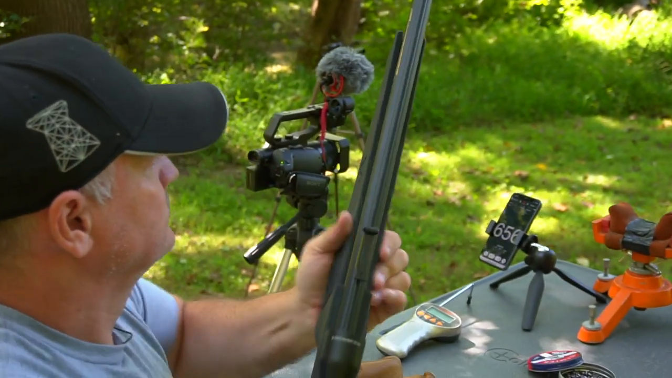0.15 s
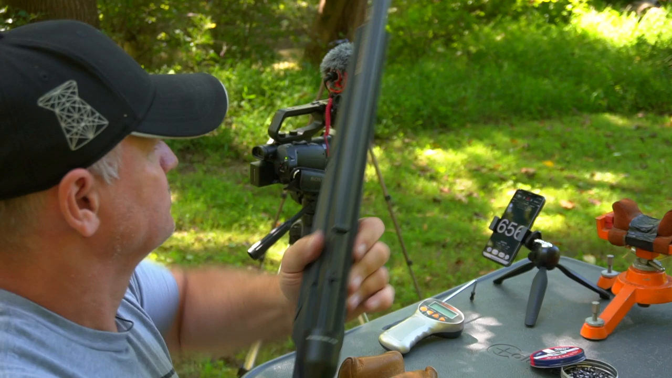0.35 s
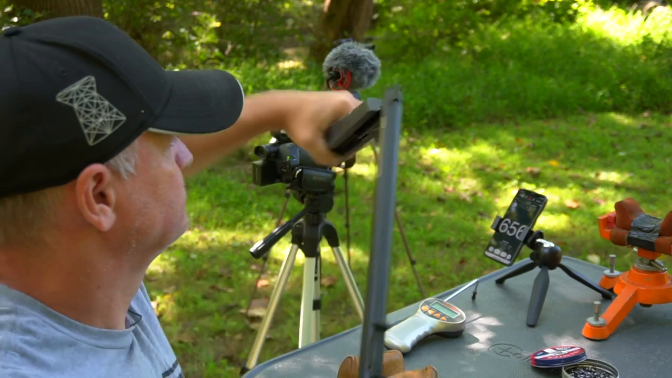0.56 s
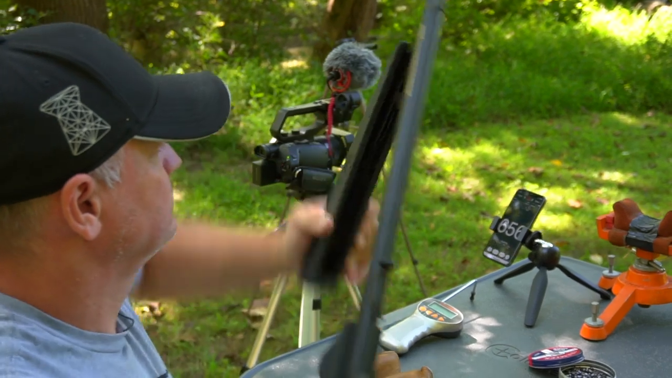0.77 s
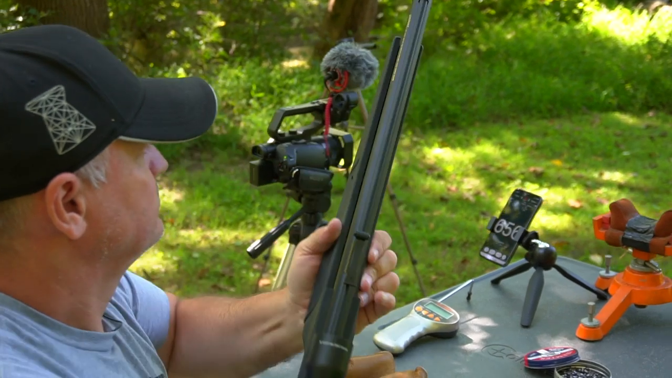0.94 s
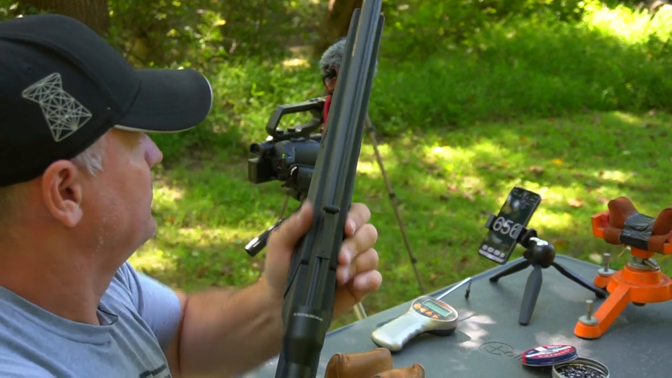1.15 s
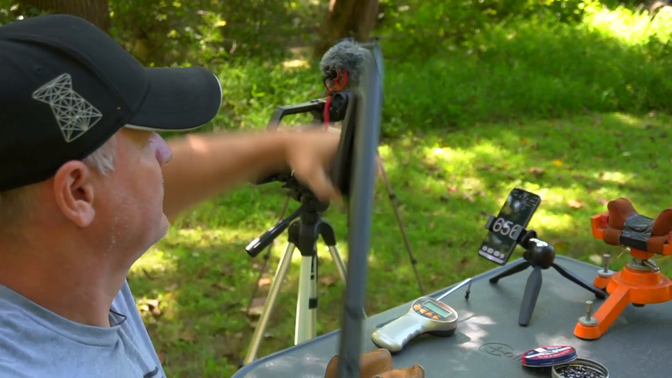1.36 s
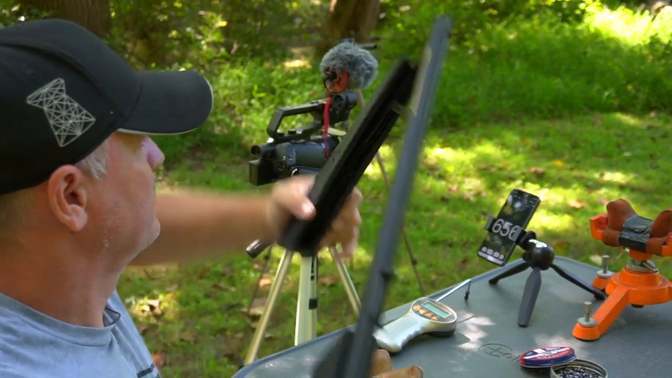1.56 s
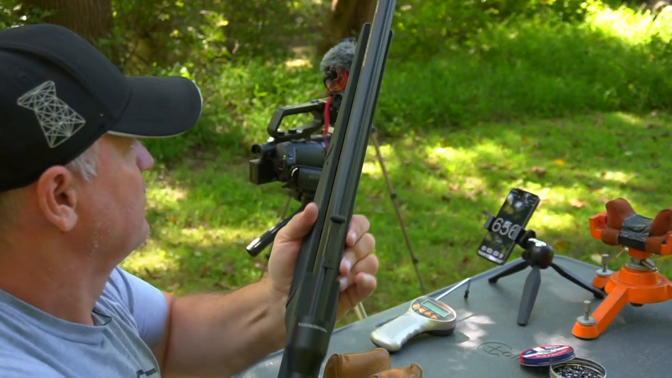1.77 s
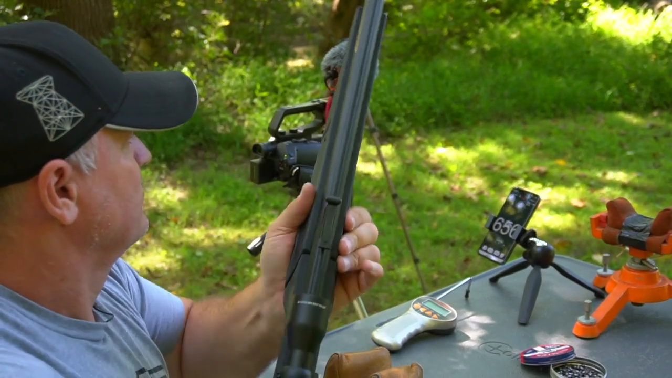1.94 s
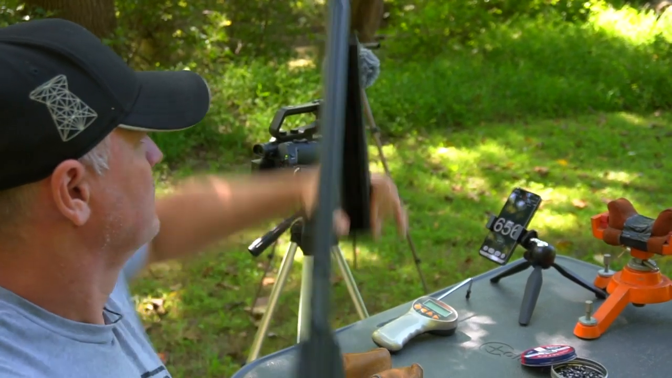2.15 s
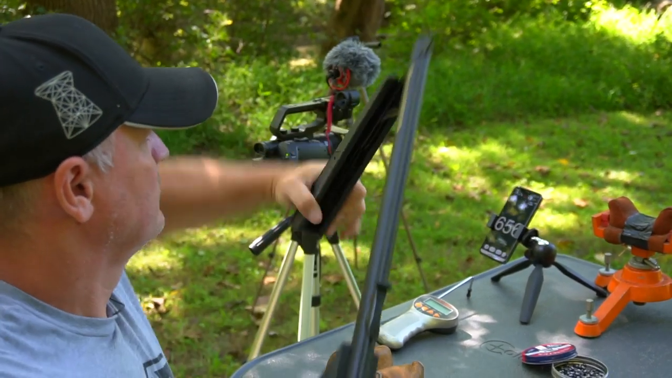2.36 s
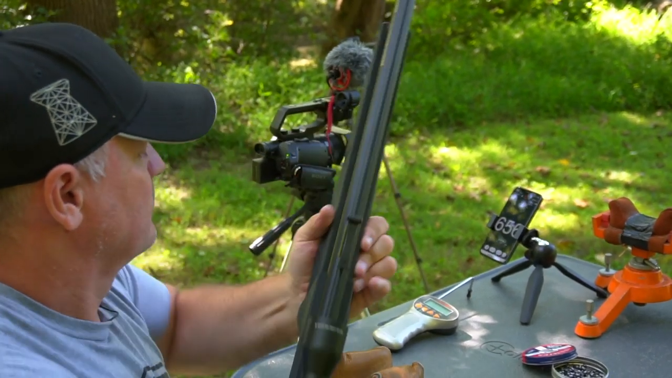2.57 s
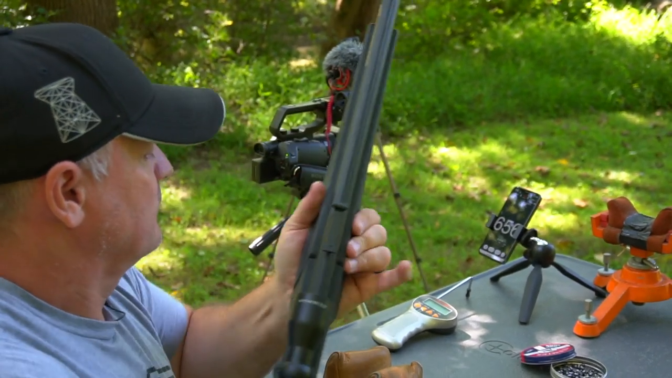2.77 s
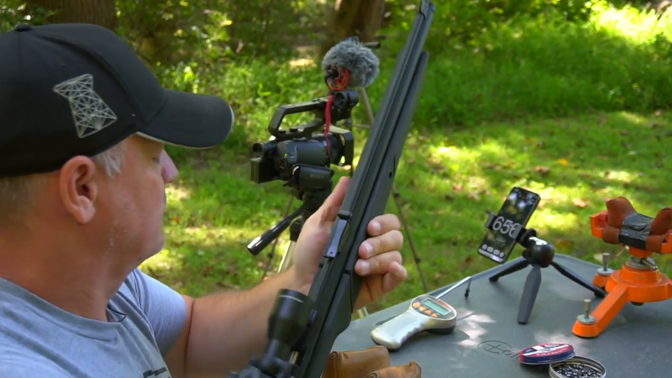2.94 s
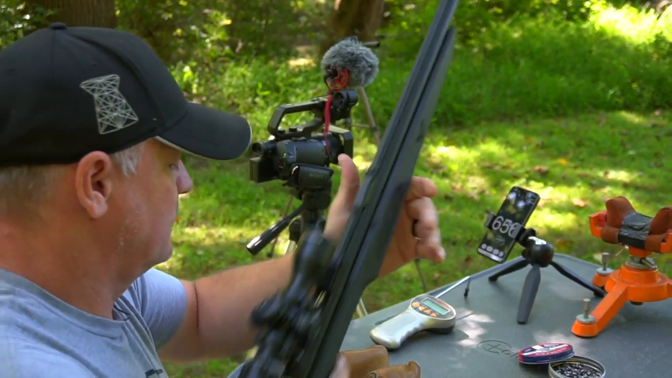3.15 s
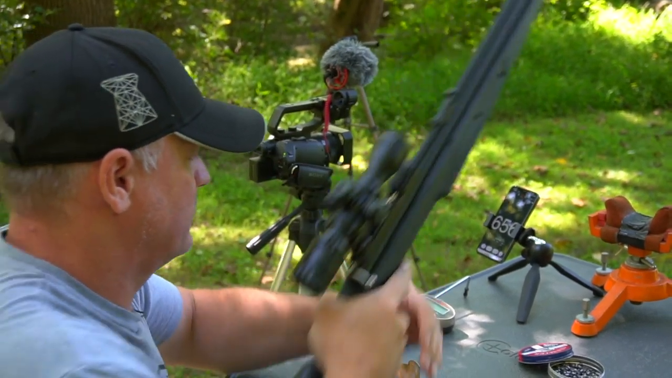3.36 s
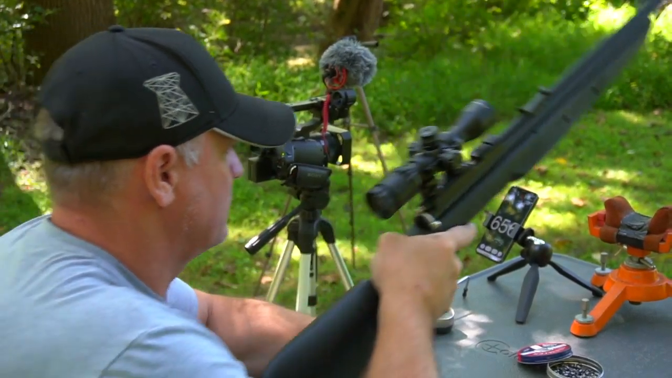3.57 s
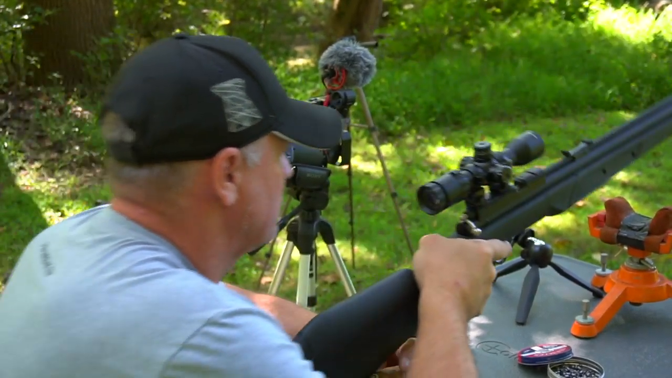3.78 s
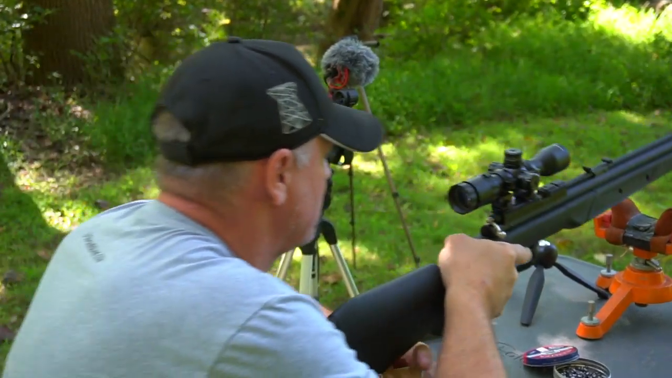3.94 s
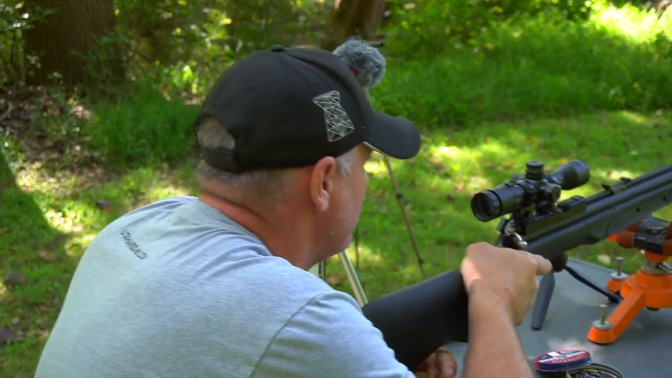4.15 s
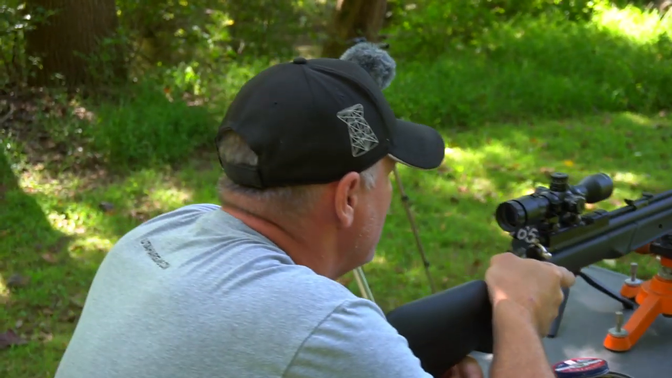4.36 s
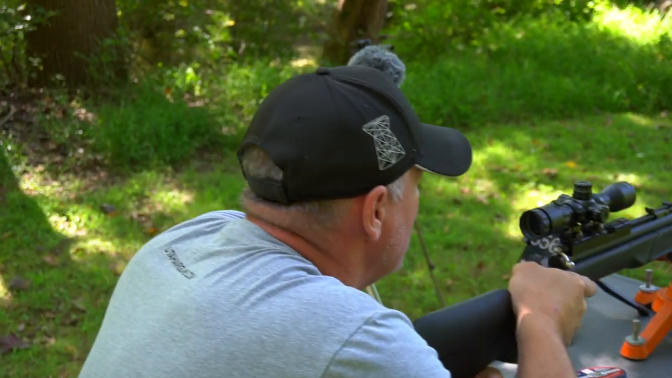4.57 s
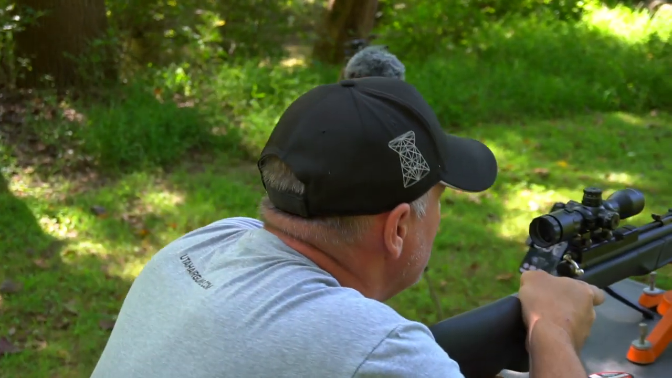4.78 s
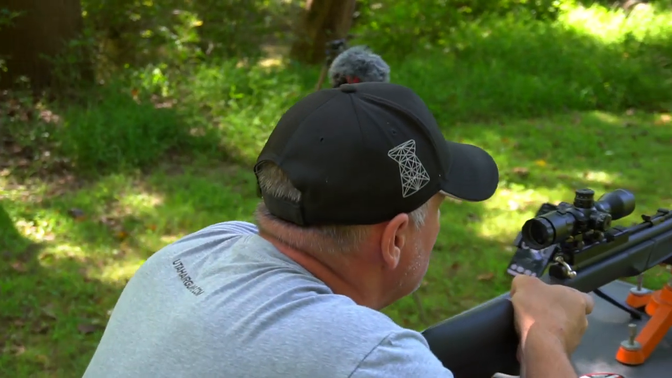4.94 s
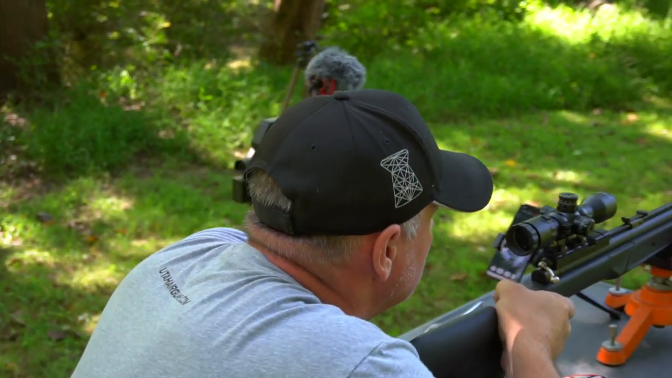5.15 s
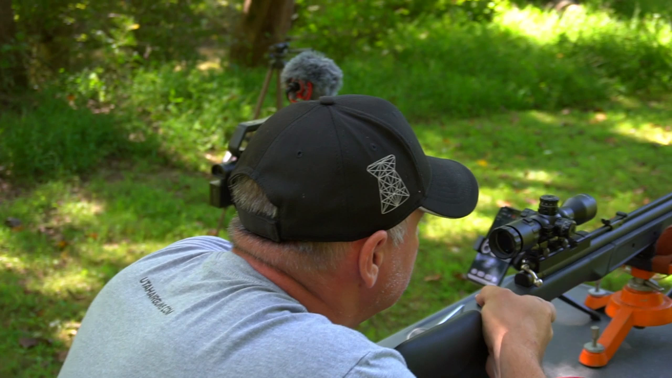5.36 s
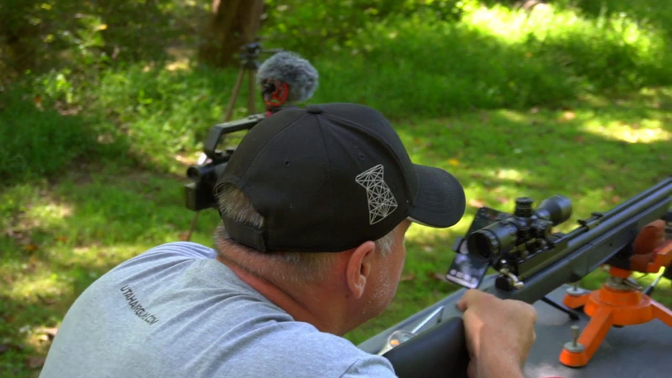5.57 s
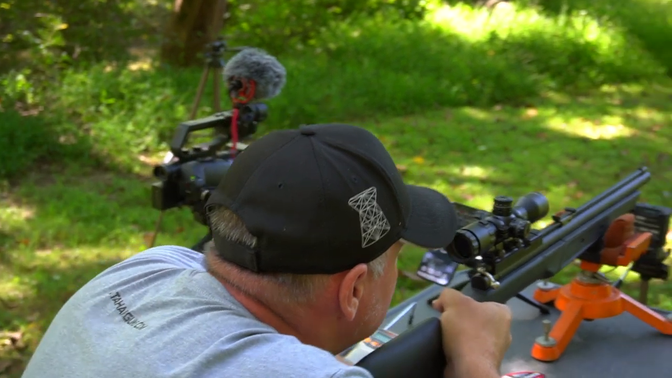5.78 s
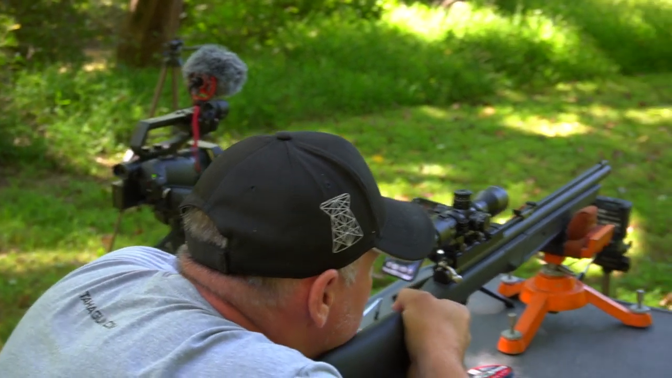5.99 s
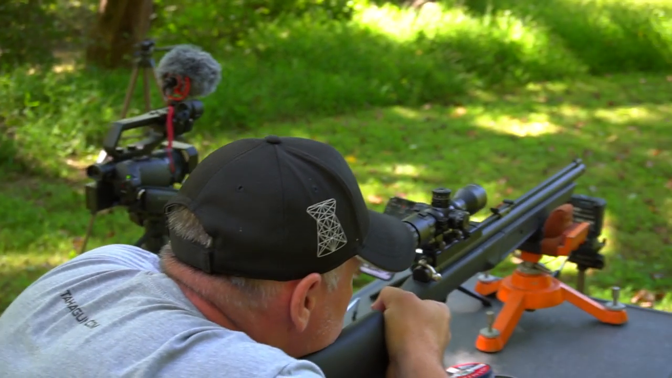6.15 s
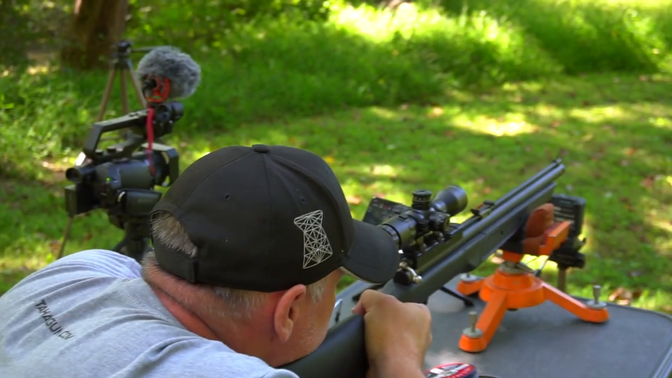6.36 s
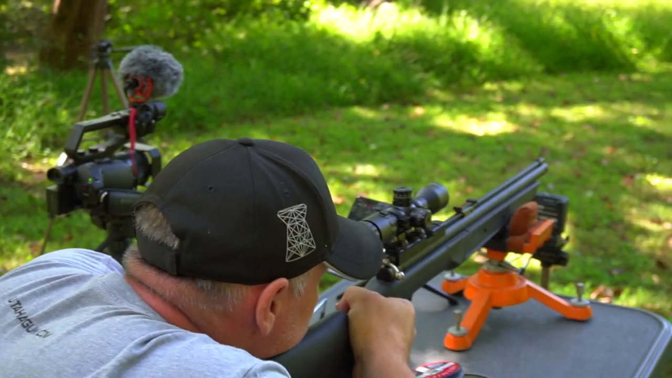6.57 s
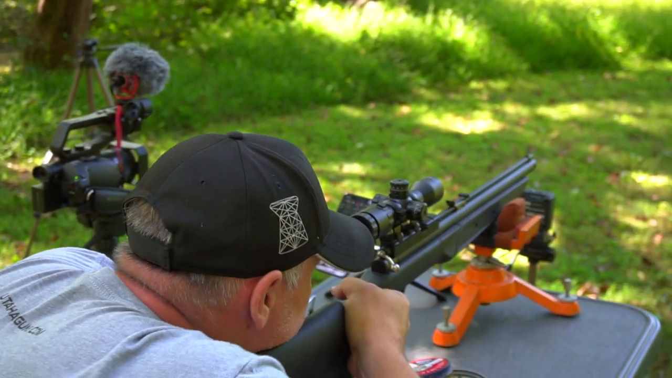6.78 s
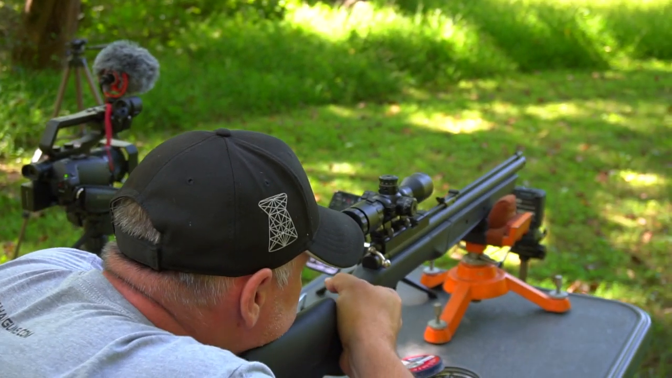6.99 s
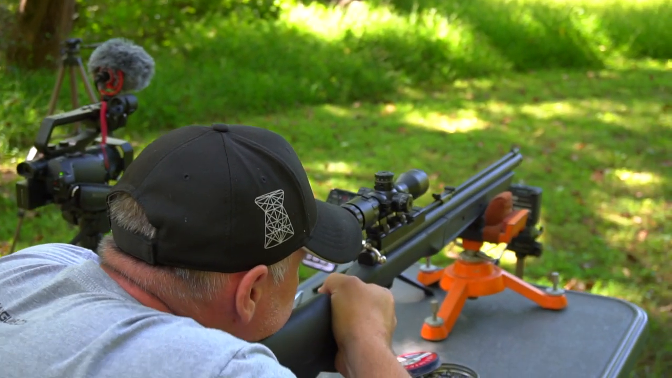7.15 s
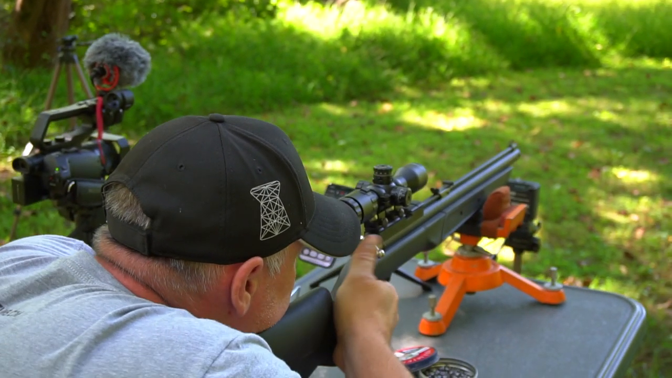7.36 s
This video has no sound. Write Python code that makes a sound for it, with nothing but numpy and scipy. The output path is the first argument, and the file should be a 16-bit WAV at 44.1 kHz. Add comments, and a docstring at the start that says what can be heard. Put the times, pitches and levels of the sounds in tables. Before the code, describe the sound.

In a leafy yard with steady cicadas, a nearby rifle lever squeaks and cracks shut four times, the first three followed by clattering linkage and scraping piston. Each blow leaves a thin echo in the trees. Then it is quieter: insect buzz, distant engine hum rising, wind gust, clicks and thuds of settling on a rest, sleeve rustle, and late katydid ticks.

```python
"""Cicadas drone over leafy air, light wind rumble on the microphone and a far engine's hum in a yard ringed by trees.
An air rifle is pumped four times: stick-slip squeaks under rising pressure, then a modal slam as the lever shuts.
After the first three slams the linkage rattles open and the piston scrapes; a katydid buzzes after the fourth.
Then the rifle is readied with bumps and clicks and laid on a rest, while the engine revs up and slowly fades.
Wind gusts and freshens, a sleeve brushes the table, and the katydid ticks and buzzes again near the end."""
import sys
import numpy as np
from scipy import signal
from scipy.fft import rfft, irfft, next_fast_len
from scipy.io import wavfile
from scipy.ndimage import uniform_filter1d, map_coordinates

SR = 44100
rng = np.random.default_rng(int(sys.argv[2]) if len(sys.argv) > 2 else 0)


def to_wav(sig):
    """Store sig (one row per channel, or 1-D mono) as 16-bit WAV at the path in sys.argv[1].

    Samples outside -1..1 are clipped; the rate is SR.
    """
    pcm = np.clip(np.atleast_2d(sig), -1, 1) * 32767
    pcm = np.round(pcm).astype(np.int16)
    wavfile.write(sys.argv[1], SR, pcm.T)  # frames by channels


N = 327222


def amp(db):
    """Decibels to gain."""
    return 10 ** (np.asarray(db) / 20)


def unit(x):
    """Scaled to rms 1."""
    return x / np.sqrt(np.mean(x ** 2) + 1e-20)


def along(points, hz):
    """(Hz, value) points read on a log frequency axis."""
    f, v = np.transpose(points)
    return np.interp(np.log(hz + 1), np.log(f), v)


def wobble(rate):
    """A smooth random curve with rate knots a second."""
    knots = rng.standard_normal(int(N * rate / SR) + 4)
    return map_coordinates(knots, [np.arange(N) * rate / SR])


def filtered(x, response):
    """x times a response of frequency."""
    m = next_fast_len(len(x) + 4096)
    return irfft(rfft(x, m) * response(np.fft.rfftfreq(m, 1 / SR)), m)[:len(x)]


def noise(spectrum, size=N):
    """Coloured noise of rms 1."""
    return unit(filtered(rng.standard_normal(size), lambda hz: amp(along(spectrum, hz))))


def resonate(x, peaks):
    """x through parallel resonances of alternating sign, at rms 1."""
    def response(f):
        """Sum of band-pass resonances."""
        total = 0
        for k, (centre, width, db) in enumerate(peaks):
            band = 1j * f * width / (centre * centre - f * f + 1j * f * width)
            total = total + (-1) ** k * amp(db) * band
        return total

    return unit(filtered(x, response))


def even(x, size=SR // 50):
    """Held at rms 1 from moment to moment."""
    return x / np.sqrt(np.abs(uniform_filter1d(x ** 2, size)) + 1e-9)


def fade(t, t60):
    """Exponential decay by 60 dB in t60 seconds."""
    return np.exp(-np.log(1000) * t / t60)


def ramp(u):
    """A smooth step from 0 to 1 as u goes from 0 to 1."""
    return np.sin(np.pi / 2 * np.clip(u, 0, 1)) ** 2


def swell(from_s, db_per_s):
    """A level in dB that holds at 0, then climbs steadily."""
    return db_per_s * np.maximum(np.arange(N) / SR - from_s, 0)


def add(track, s, sound):
    """Mix a sound in at s seconds."""
    part = track[max(round(s * SR), 0):][:len(sound)]
    part += sound[:len(part)]


CICADA_DB, CICADA_SWELL_FROM_S, CICADA_SWELL_DB_PER_S = -49, 4.27, 3
# colour of the massed cicadas: [f/Hz, relative level/dB per Hz]
CHORUS_SPECTRUM = [(2800, -39.5), (3850, -26), (4320, -15), (4700, -18), (5400, -4), (5950, 2), (6620, -5),
                   (7000, -10.5), (8060, -17.5), (10000, -35), (14000, -59.5)]


def cicadas():
    """Many cicadas blur into one band of noise that flickers slightly and later swells."""
    flicker_db = .4 * wobble(5.7) + .8 * wobble(90)
    level_db = CICADA_DB + swell(CICADA_SWELL_FROM_S, CICADA_SWELL_DB_PER_S) + flicker_db
    return amp(level_db) * noise(CHORUS_SPECTRUM)


AIR_DB, AIR_SWELL_FROM_S, AIR_SWELL_DB_PER_S = -54.5, 5.18, 2
# colour of leaves and distance: [f/Hz, relative level/dB per Hz]
BREEZE_SPECTRUM = [(50, 6.5), (100, 3.5), (300, 2), (700, -1), (1500, -5.5), (3200, -10.5), (10000, -20),
                   (16000, -18.5)]


def leafy_air():
    """Air in the leaves is broad, slowly wavering noise that swells late."""
    level_db = AIR_DB + swell(AIR_SWELL_FROM_S, AIR_SWELL_DB_PER_S) + 0.65 * wobble(5.8)
    return amp(level_db) * noise(BREEZE_SPECTRUM)


WIND_DB, WIND_RISE_FROM_S, WIND_RISE_DB_PER_S = -41, 4.41, 4  # the breeze freshens
GUST_S, GUST_WIDTH_S, GUST_DB = 4.45, .2, 9
# colour of wind on the microphone: [f/Hz, relative level/dB per Hz]
RUMBLE_SPECTRUM = [(6, -16.5), (12, -1), (24, 4), (34, -7), (50, -25), (100, -36), (300, -65.5)]


def wind():
    """Wind pushes on the microphone as deep noise, with one gust as the breeze begins to freshen."""
    t = np.arange(N) / SR
    gust_db = GUST_DB * np.exp(-((t - GUST_S) / GUST_WIDTH_S) ** 2)
    return amp(WIND_DB + swell(WIND_RISE_FROM_S, WIND_RISE_DB_PER_S) + gust_db) * noise(RUMBLE_SPECTRUM)


ENGINE_IDLE_DB, ENGINE_FULL_DB = -64, -49
ENGINE_REV_S, ENGINE_RISE_S, ENGINE_FADE_DB_PER_S = 4.1, 0.46, 4.5


def engine(engine_hz=130):
    """A far engine is one wavering sine that grows louder once, then slowly dies away."""
    t = np.arange(N) / SR
    revved_db = ENGINE_FULL_DB - swell(ENGINE_REV_S + ENGINE_RISE_S, ENGINE_FADE_DB_PER_S)
    rise = ramp((t - ENGINE_REV_S) / ENGINE_RISE_S)
    level_db = ENGINE_IDLE_DB + (revved_db - ENGINE_IDLE_DB) * rise + 1.1 * wobble(10)
    turn = 2 * np.pi * np.cumsum(engine_hz + 2.4 * wobble(7.7)) / SR
    return np.sqrt(2) * np.sin(turn) * amp(level_db)


# the lever is swung open: [t/s, rattle strength/dB, piston slide length/s, intake whistle level/dB]
LEVER_OPENINGS = [(.474, -1, 0.54, -49), (1.314, 0.5, .26, -46.5), (2.155, 1, .15, -45)]
# every opening's run of two double clacks as the linkage unfolds, then three at the end stop:
# [delay/s, level/dB before strength, mean ring f/Hz, tick level/dB relative to the clack]
LINKAGE_RATTLE = [(0, -14, 1920, -12.5), (.007, -11, 1832, -17), (0.033, -18.5, 3110, -14),
                  (.042, -9, 1443, -11), (.169, -13, 2792, -11), (.184, -11.5, 1110, -15),
                  (.212, -20.5, 2713, -18.5)]
# single light touches of lever, bolt and stock:
# [t/s, level/dB, mean ring f/Hz, tick level/dB relative to the touch]
LIGHT_CONTACTS = [(0.048, -17, 1610, -20.5), (0.443, -20.5, 2030, -7.5), (0.808, -31, 2980, -19),
                  (1.642, -17, 1755, -19.5), (2.431, -32, 1910, -6), (2.477, -21, 1740, -19.5),
                  (4.114, -40.5, 704, -20.5), (4.728, -18.5, 2293, -4.5), (4.731, -23.5, 1660, -12),
                  (4.771, -34.5, 1550, -22), (5.209, -39.5, 933, -10)]


def clacks():
    """The single contacts and every opening's rattle: (s, dB, ring Hz, tick dB)."""
    for opening_s, strength_db, _, _ in LEVER_OPENINGS:
        for delay, db, hz, tick_db in LINKAGE_RATTLE:
            yield opening_s + delay, strength_db + db, hz, tick_db
    yield from LIGHT_CONTACTS


# colour of a click, also of the piston's scrape: [f/Hz, relative level/dB per Hz]
CLICK_SPECTRUM = [(300, -26.5), (800, -5), (1600, 0.5), (3000, 0), (4500, -7), (9000, -37.5)]
# colour of the bright tick: [f/Hz, relative level/dB per Hz]
TICK_SPECTRUM = [(2500, -29), (5000, 3), (8500, -2), (10500, -13), (14000, -9.5), (16000, -15.5)]
# colour of the low knock: [f/Hz, relative level/dB per Hz]
KNOCK_SPECTRUM = [(60, -26), (150, -3.5), (550, 0.5), (1200, -14), (4000, -61)]


def contacts(click_db=-5, click_t60=0.026, ring_db=-6, ring_t60=.035, knock_db=-25, knock_t60=0.048,
             tick_trim_db=4, tick_t60=0.025, chatter_s=0.0046, chatter_db=-7):
    """Each light contact is a click, a ringing part, a low knock and a tick; the loose joint chatters once after."""
    out, t = np.zeros(N), np.arange(SR // 8) / SR
    attack = 1 - np.exp(-t / .002)
    for s, db, hz, tick_db in clacks():
        for late, drop_db in [(0, 0), (chatter_s * rng.uniform(0.27, 1), chatter_db)]:
            click = amp(click_db) * noise(CLICK_SPECTRUM, size=len(t)) * fade(t, click_t60)
            turn = 2 * np.pi * hz * rng.normal(1, .02) * t
            partials = np.sin(turn) + .5 * np.sin(1.7 * turn) + 0.44 * np.sin(2.2 * turn)
            ring = amp(ring_db) * partials * fade(t, ring_t60)
            knock = amp(knock_db) * noise(KNOCK_SPECTRUM, size=len(t)) * fade(t, knock_t60)
            tick = amp(tick_db + tick_trim_db) * noise(TICK_SPECTRUM, size=len(t)) * fade(t, tick_t60)
            add(out, s + late, amp(db + drop_db) * (click + ring + knock + tick) * attack)
    return out


SQUEAL_ATTACK_S, SQUEAL_LOAD, SQUEAL_LEAK_DB = .005, .15, -10  # load runs 0-1, leak is relative
PUSH_ATTACK_S, PUSH_RELEASE_S, PUSH_EASE_DB = .008, .03, 5.5  # the arm eases off as the lever goes over centre
LOAD_RISE_S, LOADED_SLIPS_PER_S = .04, 300
SAG_LEAD_S, SAG_S = .02, 0.046  # the slips begin to slow before the pressure bites
SPIN_UP, SPIN_UP_S = .14, .022  # share by which the slips start slow, time to reach full speed
WAVER, WAVER_PER_S = .045, 55  # the arm pushes unevenly: share of the slip rate, knots per second
JUDDER_DB, JUDDER_PER_S = 1.3, 120
# the unloaded pivot squeals and slows as the lever starts to close:
# [t/s, length/s, first slip f/Hz, last slip f/Hz, level/dB before trim]
PIVOT_SQUEALS = [(0.158, 0.053, 1830, 135, -26.5), (.961, .028, 1050, 410, -26.5),
                 (1.771, .038, 2150, 580, -31)]
# the push that compresses the air: [t/s, length/s, free slip f/Hz, pressure bite after/s,
# full air load/0-1, free level/dB before trim, loaded level/dB before trim]
PUMP_PUSHES = [(0.206, .067, 320, .027, 0.7, -21, -12.5), (.981, .122, 560, .07, 0.7, -20.5, -17),
               (1.818, 0.12, 610, .062, 0.2, -23.5, -22.5), (2.701, 0.086, 440, 0.042, 0.98, -22, -18.5)]


def strokes():
    """Each squeal and push as (start s, slips per second, level dB, air load, leak dB)."""
    for s, length, first, last, db in PIVOT_SQUEALS:
        t = np.arange(1, length * SR) / SR
        rate = first * (last / first) ** ramp(t / length)
        attack_db = 20 * np.log10(ramp(t / SQUEAL_ATTACK_S))
        yield s, rate, db + attack_db, SQUEAL_LOAD, SQUEAL_LEAK_DB
    for s, length, free, bite, full, free_db, loaded_db in PUMP_PUSHES:
        t = np.arange(1, length * SR) / SR
        pressure = ramp((t - bite) / LOAD_RISE_S + .5)
        rate = free + (LOADED_SLIPS_PER_S - free) * ramp((t - bite + SAG_LEAD_S) / SAG_S + .5)
        rate *= 1 - SPIN_UP * (1 - ramp(t / SPIN_UP_S))
        rate *= np.exp(WAVER * wobble(WAVER_PER_S)[:len(t)])
        db = free_db + (loaded_db - free_db) * pressure
        db -= PUSH_EASE_DB * ramp((t - length) / PUSH_RELEASE_S + 1) ** 2
        db += JUDDER_DB * wobble(JUDDER_PER_S)[:len(t)]
        attack_db = 20 * np.log10(ramp(t / PUSH_ATTACK_S))
        yield s, rate, db + attack_db, full * pressure, 0


# what the slipping pivot rings: [f/Hz, width/Hz, relative level/dB]
LINKAGE_PEAKS = [(1062, 330, -11), (2260, 280, 2), (3050, 190, -5.5), (3490, 200, -7.5), (3940, 335, -8.5),
                 (5200, 380, -1), (6150, 200, -3.5), (6320, 200, -6.5), (9030, 560, -17.5)]
# what the loaded pump tube adds: [f/Hz, width/Hz, relative level/dB]
TUBE_PEAKS = [(315.3, 68, -10.5), (597, 390, -2.5), (930, 92, 4.5), (1440, 840, 4.5), (1897, 640, 6.5)]
# colour of air passing the seal: [f/Hz, relative level/dB per Hz]
LEAK_SPECTRUM = [(2500, -24.5), (5000, -6), (8500, 4.5), (10500, -7), (12000, 3.5), (14500, -1),
                 (16000, -15)]


def squeaks(scatter_db=2.0, smear_s=.005, tube_db=-1, trim_db=-1, leak_trim_db=-11):
    """The pivot sticks and slips; air load roughens the slips and shakes the pump tube as air hisses past the seal."""
    out = np.zeros(N)
    for s, rate, db, load, leak_db in strokes():
        t = np.arange(len(rate)) / SR
        load = np.clip(load, 0, 1)
        cycle = np.cumsum(rate / SR).astype(int)
        drift, size = rng.standard_normal((512, 2))[cycle].T  # one draw per slip
        phase = np.cumsum(rate * np.exp((.008 + .05 * load) * drift) / SR)
        # one narrow pulse per slip, at equal power whatever the rate
        slips = np.sinc((phase % 1 - .5) * SR / rate) * np.sqrt(SR / rate)
        slips *= amp(scatter_db * size)
        # bending waves in the steel carry the treble faster, which smears each pulse
        slips = filtered(slips, lambda hz: np.exp(-2j * np.pi * smear_s * np.sqrt(hz * 1000)))
        force = slips + (.08 + .4 * load) * rng.standard_normal(len(t))
        pivot = even(resonate(force, LINKAGE_PEAKS)) * (1 - 0.45 * load)
        tube = amp(tube_db) * load * even(resonate(force, TUBE_PEAKS))
        # the hiss is strongest in mid-stroke and pulses with the slips
        hiss = amp(leak_trim_db + leak_db) * np.sqrt(np.hanning(len(t)))
        hiss *= (1 - .6 * np.cos(2 * np.pi * phase)) * noise(LEAK_SPECTRUM, size=len(t))
        add(out, s, amp(db + trim_db) * (pivot + tube + hiss))
    return out


INTAKE_DELAY_S, INTAKE_S, INTAKE_HZ = .068, .075, (681, 2200)  # after each opening: start and end pitch
SQUEEZE_S, SQUEEZE_DB, SQUEEZE_HZ = .055, -30.5, (889, 2990)  # ends at each slam


def whistles():
    """Short breathy glides that rise as the piston travels."""
    out = np.zeros(N)
    squeezes = [(s - SQUEEZE_S, SQUEEZE_S, SQUEEZE_HZ, SQUEEZE_DB) for s, *_ in LEVER_SLAMS]
    intakes = [(s + INTAKE_DELAY_S, INTAKE_S, INTAKE_HZ, db) for s, _, _, db in LEVER_OPENINGS]
    for s, length, (start_hz, end_hz), db in squeezes + intakes:
        hz = np.geomspace(start_hz, end_hz, int(length * SR))
        breathy_hz = hz * (1 + .25 * rng.standard_normal(len(hz)))
        tone = np.sin(2 * np.pi * np.cumsum(breathy_hz) / SR)
        add(out, s, amp(db) * tone * np.sqrt(np.hanning(len(hz))))
    return out


TOUCH_HARD, BOUNCE_S, BOUNCE_HARD = 1, .0045, .9  # hardness runs from 0 to 1
SETTLE_S, SETTLE_DB, SETTLE_HARD = .039, -17, .3
REBOUND_HARD = 0.1002
# the lever hits home: [t/s, level/dB, first touch earlier by/s, first touch level/dB, bounce level/dB]
LEVER_SLAMS = [(0.2756, -1, 0.0089, -7.5, -8), (1.104, 1, .013, -16.5, -9),
               (1.946, 1.5, .002, -31.5, -13.5), (2.783, 0.5, .0045, -13, -6.5)]
# the lever rebounds softly in the grip: [t/s, level/dB]
GRIP_REBOUNDS = [(.352, -12), (1.201, -10.5), (2.04, -11.5), (2.929, -13)]


def blows():
    """Each slam is a touch, blow, bounce and settling knock; the rebounds are listed last: (s, dB, hardness)."""
    for s, db, lead, touch_db, bounce_db in LEVER_SLAMS:
        yield s - lead, touch_db, TOUCH_HARD
        yield s, db, 1
        yield s + BOUNCE_S, bounce_db, BOUNCE_HARD
        yield s + SETTLE_S, SETTLE_DB, SETTLE_HARD
    for s, db in GRIP_REBOUNDS:
        yield s, db, REBOUND_HARD


# the rifle's modes: [f/Hz, mean relative level/dB for a hard blow, t60/s]
RIFLE_MODES = [(392, -22, 0.034), (850, -12.5, .045), (1152, -8.5, .03), (1471, -4.5, 0.073),
               (1703, -7.5, 0.047), (1975, -10, 0.074), (2353, -5, 0.012), (2848, -8, 0.026),
               (4300, -17, 0.014)]
# colour of the impact: [f/Hz, relative level/dB per Hz]
CRACK_SPECTRUM = [(60, -55), (170, -31.5), (400, -21.5), (750, -14), (1400, -1), (1900, -5.5), (2700, -6),
                  (3700, -11.5), (5200, -10), (8600, -14), (10500, -27.5), (13700, -23), (16000, -30)]


def slams(crack_t60=0.026, crack_db=0, ring_db=-5, buzz_db=-22, buzz_t60=0.17, soft_db_per_khz=3):
    """The lever cracks on the tube, rings the rifle and leaves loose parts buzzing; soft blows ring duller."""
    out, t = np.zeros(N), np.arange(SR // 4) / SR
    for s, db, hard in blows():
        ring = np.zeros(len(t))
        for hz, mode_db, t60 in RIFLE_MODES:
            level_db = mode_db + rng.normal(0, 1.7) - soft_db_per_khz * (1 - hard) * hz / 1000
            ring += amp(level_db) * fade(t, t60) * rng.choice([-1, 1]) * np.sin(2 * np.pi * hz * t)
        decay = amp(crack_db) * fade(t, crack_t60) + amp(buzz_db) * fade(t, buzz_t60)
        crack = noise(CRACK_SPECTRUM, size=len(t)) * decay
        add(out, s, amp(db) * (hard * crack + amp(ring_db) * ring))
    return out


SLIDE_LEAD_S = .035  # the piston moves before the first clack


def sliding(slide_db=-54, hiss_db=-54, grain_db=5):
    """While the lever is open, the piston scrapes unevenly along its tube and draws in air."""
    moving = np.zeros(N)
    for s, _, length, _ in LEVER_OPENINGS:
        add(moving, s - SLIDE_LEAD_S, signal.windows.tukey(int(length * SR), .5))
    scrape = amp(slide_db) * noise(CLICK_SPECTRUM) + amp(hiss_db) * noise(LEAK_SPECTRUM)
    return moving * scrape * amp(grain_db * wobble(55))


def distant_whine(far_db=-60, far_hz=690):
    """A faint distant whine is narrow noise that swells and fades once."""
    t = np.arange(N) / SR
    passing = np.exp(-((t - 3.55) / .3) ** 2)
    return amp(far_db) * passing * resonate(rng.standard_normal(N), [(far_hz, 70, 0)])


KATYDID_RELEASE_S = .15
# bouts of buzzing: [start t/s, end t/s, rise/s, level/dB before wing-stroke pulsing]
KATYDID_BOUTS = [(3.1, 4.25, 0.34, -69.5), (6.6, 7.6, .75, -57)]
# separate ticks: [t/s, level/dB]
KATYDID_TICK_TIMES = [(6.58, -57), (6.688, -54), (6.783, -53), (6.862, -54)]
# colour of the rasping wings: [f/Hz, relative level/dB per Hz]
WING_SPECTRUM = [(9000, -27.5), (11000, -6), (12300, 2.5), (14000, -5.5), (16000, -17)]


def katydid(wing_hz=39, wing_depth_db=5, tick_width=.009):
    """A katydid's noise band pulses with each wing stroke; a run of ticks joins the second bout."""
    t = np.arange(N) / SR
    bouts, ticks = np.zeros(N), np.zeros(N)
    for start, end, rise, db in KATYDID_BOUTS:
        bouts += amp(db) * ramp((t - start) / rise) * ramp((end - t) / KATYDID_RELEASE_S)
    for s, db in KATYDID_TICK_TIMES:
        ticks += amp(db) * np.exp(-((t - s) / tick_width) ** 2)
    stroke = np.sin(2 * np.pi * wing_hz * t + .4 * wobble(4))
    return (bouts * amp(wing_depth_db * stroke) + ticks) * noise(WING_SPECTRUM)


# dull bumps of the stock on body and rest: [t/s, level/dB, f/Hz]
STOCK_BUMPS = [(3.78, -48.5, 604), (4.116, -44, 640), (4.732, -28, 145), (4.737, -34.5, 348),
               (4.775, -37.5, 304), (4.953, -45, 376), (5.887, -32, 497), (5.892, -38, 332),
               (6.11, -46, 615)]


def bumps(bump_t60=0.077, thud_db=-6):
    """The stock bumps into place: a damped sine with a noisy thud around the same pitch."""
    out, t = np.zeros(N), np.arange(SR // 6) / SR
    for s, db, hz in STOCK_BUMPS:
        thud = amp(thud_db) * resonate(rng.standard_normal(len(t)), [(hz, hz / 2, 0)])
        add(out, s, amp(db) * fade(t, bump_t60) * (np.sin(2 * np.pi * hz * t) + thud))
    return out


# a sleeve brushes the table: [middle t/s, length/s, level/dB]
SLEEVE_BRUSHES = [(5.625, 0.22, -44), (6.71, 0.31, -45.5), (6.98, .16, -50.5)]
# colour of the cloth: [f/Hz, relative level/dB per Hz]
CLOTH_SPECTRUM = [(100, -6.5), (350, 3.5), (1600, -1), (3000, -12), (9000, -18.5), (16000, -28)]


def sleeve():
    """Cloth on the table is soft noise, slightly grainy, rising and falling with each stroke."""
    brushing = np.zeros(N)
    for s, length, db in SLEEVE_BRUSHES:
        add(brushing, s - length / 2, amp(db) * np.hanning(int(length * SR)))
    return brushing * amp(1.5 * wobble(60)) * noise(CLOTH_SPECTRUM)


# decay of the trees' answer: [f/Hz, t60/s]
TREE_DECAY = [(150, 0.83), (700, 0.73), (1500, 1.25), (3000, 2.7), (6000, 0.71), (14000, 0.4)]


def echoes(x, near_db=-16, near_t60=0.4, near_hz=8000, far_db=-22, build_s=0.018):
    """Table and ground scatter, the trees answer with a long thin tail; both are diffuse noise shaped by the energy."""
    hz, _, z = signal.stft(x, SR, nperseg=256)
    power = uniform_filter1d(np.abs(z) ** 2, size=5, axis=0)
    t = np.arange(SR * 3 // 256) * 128 / SR

    def tail(t60):
        """Energy that returns over time, summing to 1."""
        energy = (fade(t, t60) * (1 - np.exp(-t / build_s))) ** 2
        return energy / energy.sum(axis=-1, keepdims=True)

    hz = hz[:, None]
    near = amp(near_db) ** 2 * tail(near_t60) / (1 + (hz / near_hz) ** 2)
    trees = amp(far_db) ** 2 * tail(along(TREE_DECAY, hz))
    returns = (near + trees) * hz ** 2 / (hz ** 2 + 450 ** 2)  # leaves and twigs hardly scatter the bass
    field = np.sqrt(np.abs(signal.fftconvolve(power, returns, axes=1)))[:, :z.shape[1]]
    carrier = signal.stft(rng.standard_normal(N), nperseg=256)[2]
    return signal.istft(field * carrier / carrier.std(), nperseg=256)[1][:N]


def scene():
    """The rifle close by, in its yard."""
    yard = cicadas() + leafy_air() + wind() + engine() + distant_whine() + katydid()
    rifle = contacts() + squeaks() + whistles() + slams() + sliding() + bumps() + sleeve()
    return (yard + rifle + echoes(rifle))[None]


TOP_HZ = 16200


def record(dry):
    """The input rounds off loud peaks; nothing is kept above the band limit."""
    clipped = dry[0] / (1 + np.abs(dry[0] / .92) ** 6) ** (1 / 6)
    return filtered(clipped, lambda hz: hz < TOP_HZ)[None]


dry = scene()
out = record(dry)
to_wav(out)
```